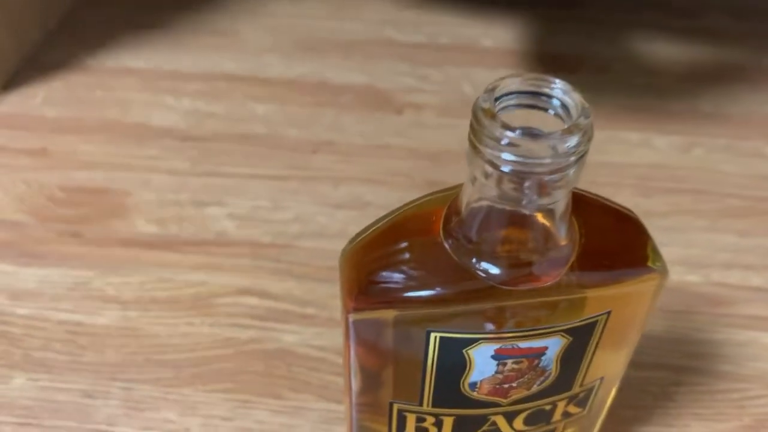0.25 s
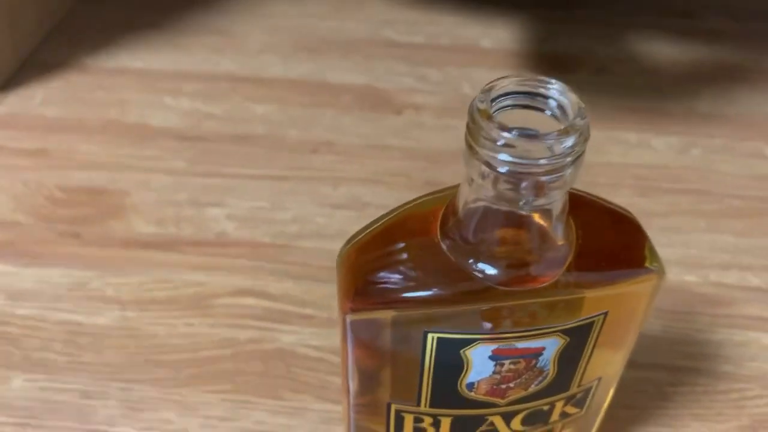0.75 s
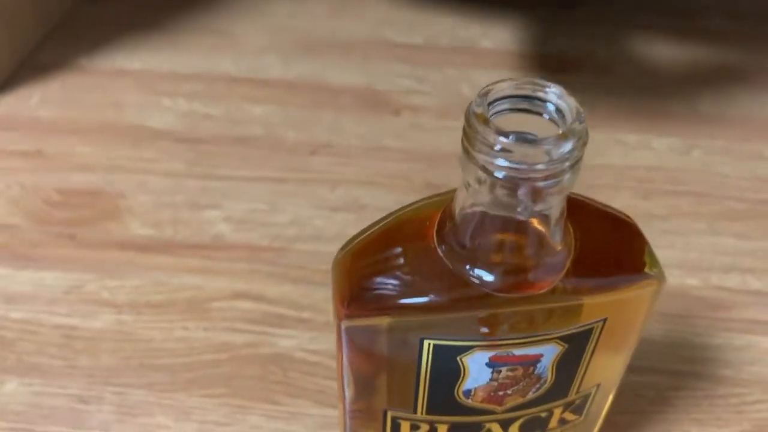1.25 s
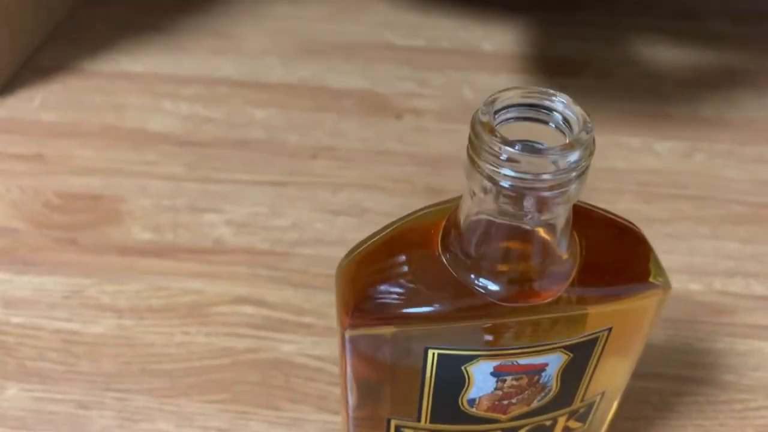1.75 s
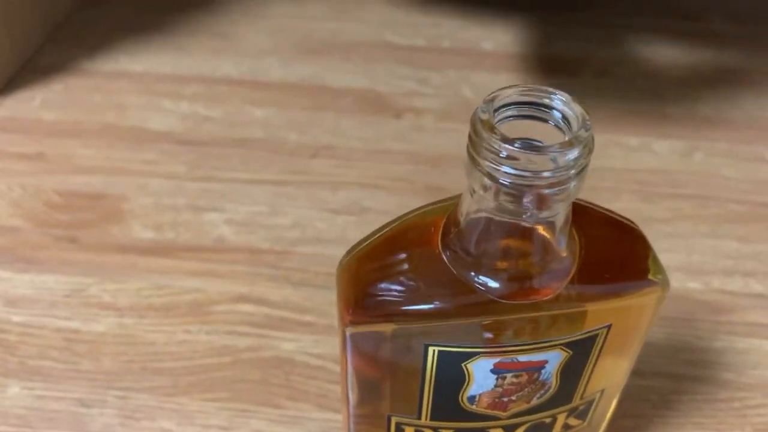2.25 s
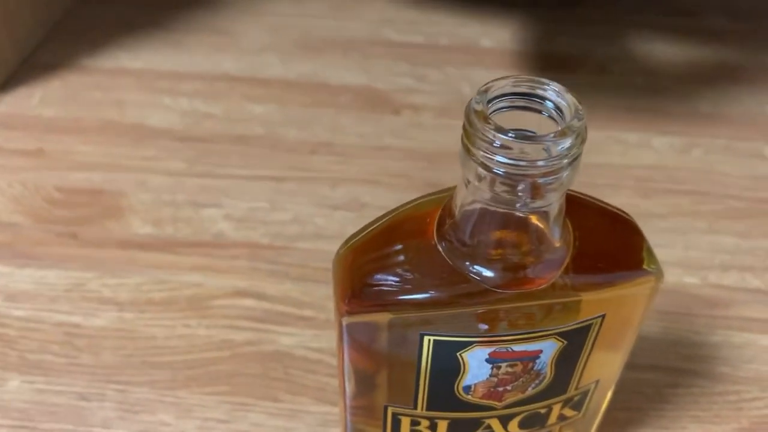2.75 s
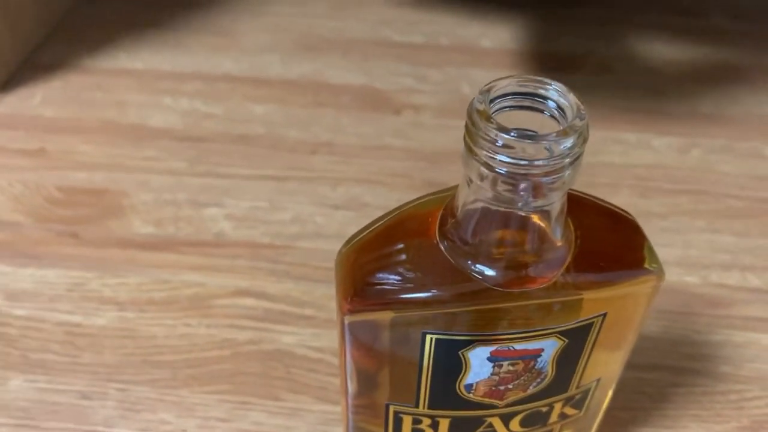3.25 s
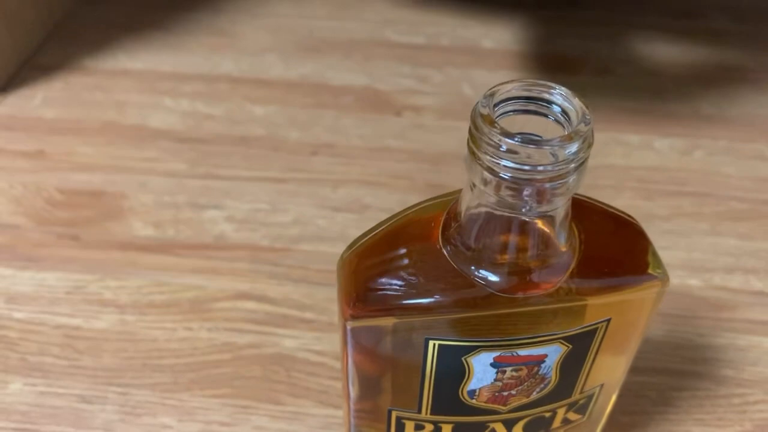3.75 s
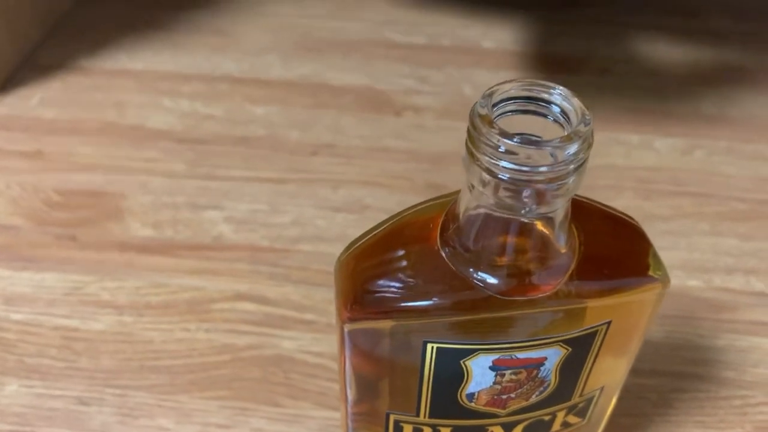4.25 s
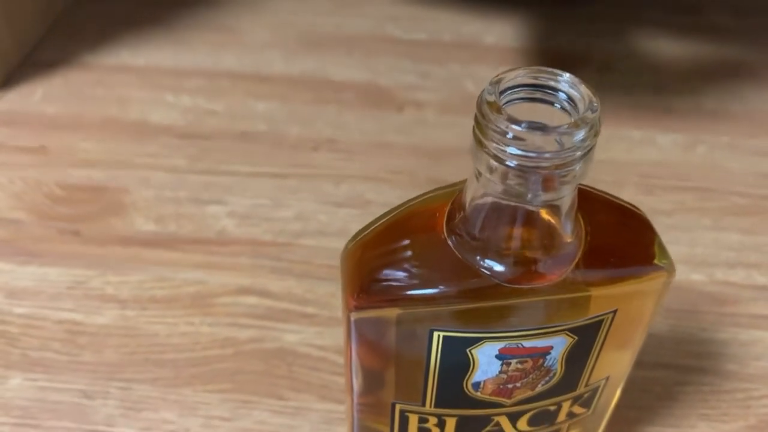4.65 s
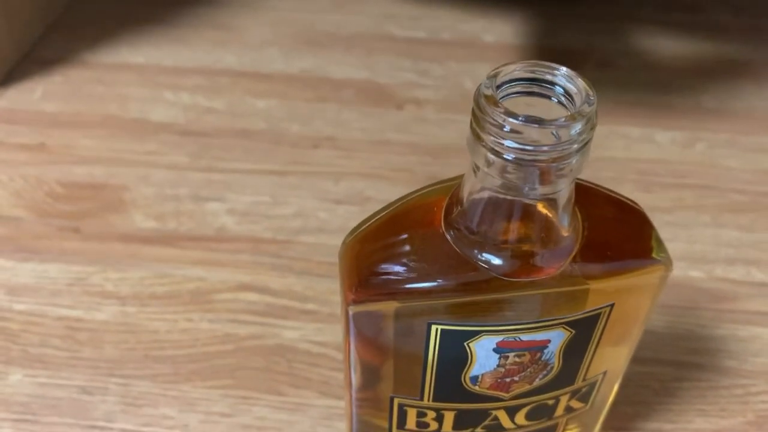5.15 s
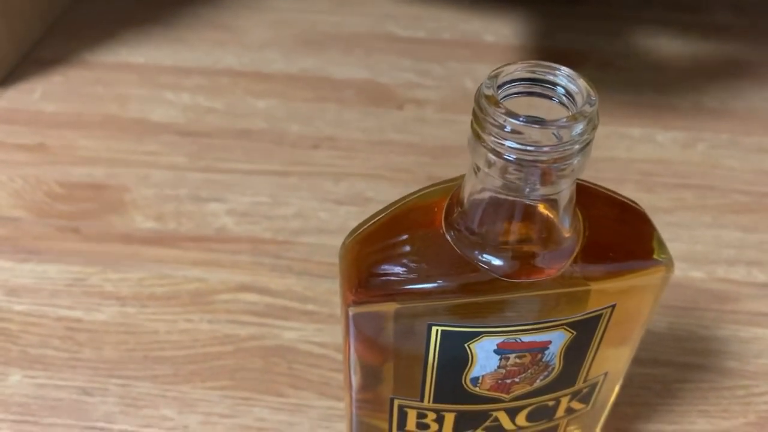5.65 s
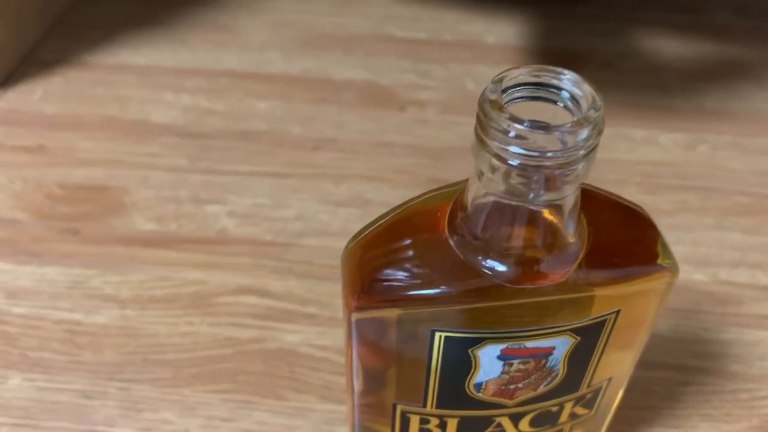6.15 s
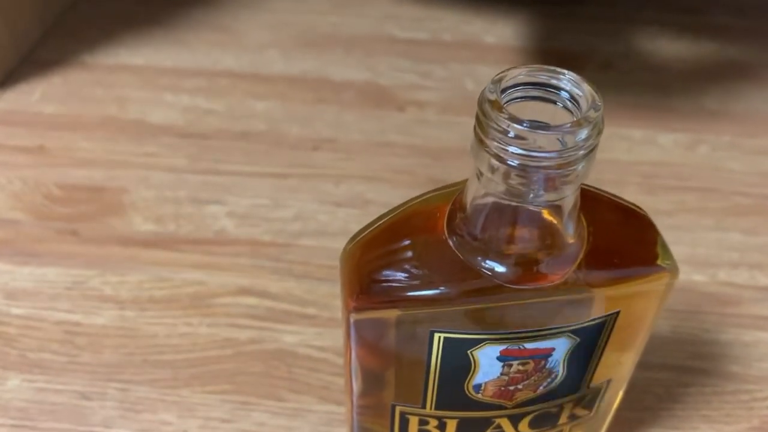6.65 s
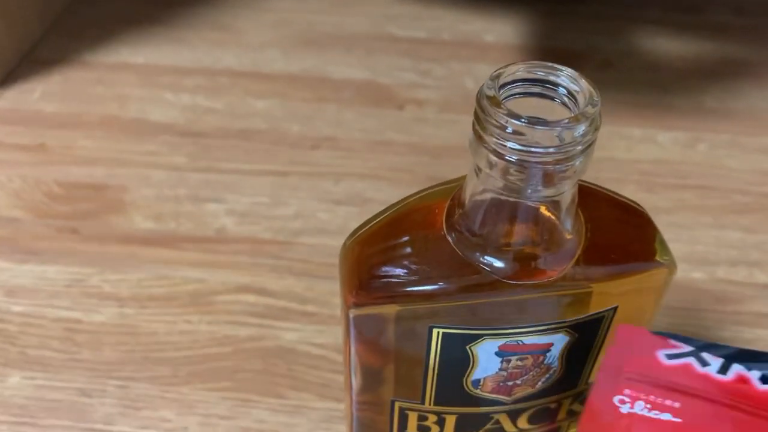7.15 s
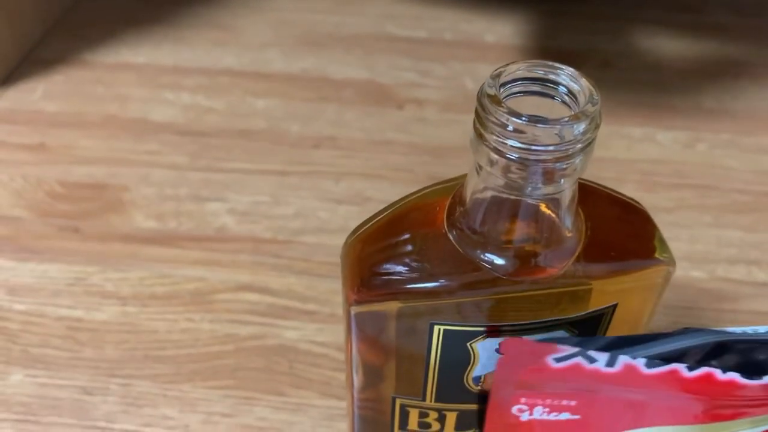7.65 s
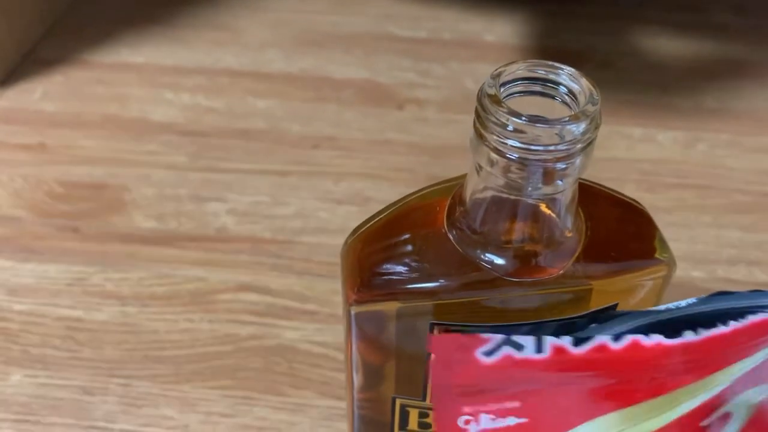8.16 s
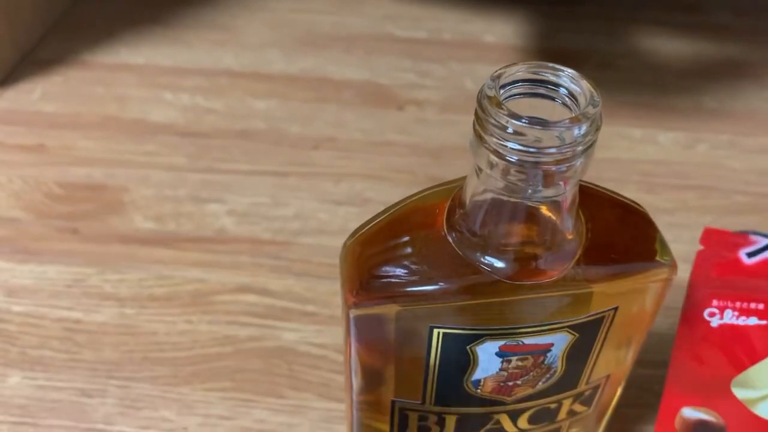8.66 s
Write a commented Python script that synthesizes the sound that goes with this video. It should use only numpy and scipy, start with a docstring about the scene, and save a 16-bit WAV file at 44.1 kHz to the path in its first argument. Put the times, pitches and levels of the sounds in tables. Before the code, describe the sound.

Close up in a small quiet room, hands brush and bump softly. A stiff plastic pouch crackles, something knocks hard on the wooden table, then a dull thud of gripping leads to dense crinkling and a short ripping tear. The opened pouch keeps rustling with a hollow ring, fades, and ends on a bump and loud snap. The hand-held stereo microphone picks up low rumble.

```python
"""A plastic snack pouch is handled close to a hand-held camera in a small quiet room, over low rumble and soft bumps.
First fingers slide on it and single creases snap, each with a faint hollow ring; drags and the first knocks follow.
Then the pouch is squeezed, which sets off swarms of tiny creases, and things knock hard on the wooden table.
A dull thud of gripping comes before the seal rips open in a run of quick plucks of the tight film. At last the mouth
of the open pouch colours the creases and its air rings louder, with one more bump, squeeze and loud snap at the end."""
import sys
import numpy as np
from scipy import signal
from scipy.fft import rfft, irfft, next_fast_len
from scipy.io import wavfile
from scipy.ndimage import uniform_filter1d

SR = 44100
rng = np.random.default_rng(int(sys.argv[2]) if len(sys.argv) > 2 else 0)


def master(y):
    """Save y as 16-bit WAV."""
    cut = np.clip(np.atleast_2d(y).T, -1, 1)
    pcm = np.round(cut * 32767)  # scale
    wavfile.write(sys.argv[1], SR, pcm.astype(np.int16))


N = 393372
TIME = np.arange(N) / SR  # [s]

# background noise of the room: (frequency [Hz], level [dB])
QUIET_SPECTRUM = [(15, -33), (25, -24), (64, -5.5), (123, -22), (1790, -30.5), (2690, -34.5), (10700, -36),
                  (13600, -25.5), (16000, -62.5)]
QUIET_DB = -75
# rumble as the hand on the camera tightens and relaxes: (time [s], level before a 4.5 dB lift [dB])
GRIP_RUMBLE = [(0.0, -62.5), (0.79, -63), (1.94, -83.5), (3.13, -82), (3.35, -65.5), (3.55, -50.5),
               (3.82, -70), (4.37, -55), (4.65, -70.5), (5.09, -59.5), (5.69, -74), (5.96, -56.5),
               (6.06, -56), (6.61, -56.5), (6.98, -74.5), (7.55, -67.5), (8.37, -83.5), (8.92, -72)]
# colour of the handling rumble: (frequency [Hz], level [dB])
RUMBLE_SPECTRUM = [(15, -40.5), (25, -12), (91, -1), (174, -8.5), (214, -8), (303, -20), (700, -28),
                   (1100, -91)]
# soft bumps of handling: (time [s], peak level before a 1.5 dB lift [dB])
BUMPS = [(0.16, -50), (0.279, -49.5), (0.934, -48.5), (1.129, -53), (1.244, -47.5), (1.351, -60.5),
         (1.664, -50.5), (1.706, -57), (1.803, -59), (3.169, -53.5), (3.431, -44), (3.472, -44.5),
         (3.57, -42.5), (3.958, -40.5), (4.02, -46), (4.81, -55.5), (4.87, -46), (4.995, -41.5),
         (5.188, -50), (5.254, -47), (5.582, -47), (5.721, -45), (8.883, -47.5)]
# fingers sliding on the film: (middle of stroke [s], length [s], hiss level [dB], rub level [dB])
STROKES = [(0.176, 0.2, -63.5, -67), (0.5, 0.6, -74.5, -71), (0.942, 0.087, -68.5, -70.5),
           (1.071, 0.04, -55, -68), (1.122, 0.4, -69.5, -74.5), (1.244, 0.1, -60.5, -70.5),
           (1.545, 0.5, -70, -78), (1.795, 0.046, -64.5, -75), (2.035, 0.049, -68.5, -77.5),
           (2.378, 0.082, -58, -66.5), (2.501, 0.077, -57.5, -65), (2.656, 0.058, -59, -69.5),
           (3.235, 0.22, -56, -59), (4.86, 0.15, -68, -65), (5.277, 0.24, -69, -66.5),
           (5.849, 0.052, -47.5, -60.5), (7.135, 0.24, -66, -66.5), (8.315, 0.35, -57, -73),
           (8.494, 0.3, -65.5, -71), (8.848, 0.14, -55.5, -59)]
# colour of fingers on film: (frequency [Hz], level [dB])
RUB_SPECTRUM = [(240, -7.5), (400, -10.5), (2930, -16), (10500, -1), (11900, 2.5), (13300, 4.5),
                (16000, -8)]
# single creases, loud and faint, and a soft low knock at 0.161 s: (time [s], strength [dB], low body over
# strength [dB],
SNAPS = [(0.161, -62.5, 10.5, -3), (0.1756, -65, 6, 5.5), (0.9134, -64.5, -31, 10), (3.2113, -48, -10, -24),
         (3.2924, -56.5, -6, -12.5), (3.318, -51.5, -10.5, 2), (3.3275, -42, -5.5, 2),
         (3.36, -40, -20, -10.5), (3.3778, -44, -1.5, 9.5), (3.4002, -32.5, -14.5, 11.5),
         (3.423, -43.5, 2.5, 13.5), (3.426, -30.5, -12.5, 6), (3.436, -40, -3.5, -5.5),
         (3.4663, -37, 0, 5.5), (3.4714, -35, -4, -7), (3.6294, -51.5, -2, 3), (3.599, -41, -16, -18),
         (3.7254, -47.5, -3, 9.5), (3.8727, -54.5, -16.5, -14), (3.8886, -46, 0, 4),
         (3.9264, -38, -11.5, -14), (3.944, -50, 4.5, 7), (3.9576, -34.5, -14, 1.5), (3.962, -40.5, -6, 1),
         (3.973, -37.5, -9, -9), (3.9823, -39, -3.5, 8.5), (4.0271, -49.5, 5.5, 7),
         (4.6465, -48.5, -12, -27), (4.832, -67, -10, 8), (4.849, -58, 0, -6), (4.912, -56, -2, -11),
         (4.9508, -67, 3, -1), (4.9699, -43.5, -8.5, -11), (5.016, -53, -16, 7), (5.5824, -41.5, -7.5, 2),
         (5.6866, -58.5, -10, 0), (5.7337, -52, -6, -21), (5.7525, -51.5, -22, 9), (6.0454, -32.5, -7.5, 6),
         (6.074, -28.5, -9, 10), (6.105, -42, -33, -20), (6.1712, -50.5, -15, -16), (6.3123, -54, 9.5, -15),
         (6.3626, -61, -7, -16), (6.4082, -46, 5, -8), (6.4823, -55.5, -2.5, -22.5), (6.5069, -31, -5, -11),
         (6.5355, -36.5, -4, -7), (6.546, -43, 1, 7.5), (6.5849, -32.5, -3, 1), (6.601, -34.5, -11, -8),
         (6.6129, -29, -16, 2.5), (6.6273, -25, -19.5, -8), (6.6392, -29, -7.5, -16),
         (6.6834, -33, -11.5, -24), (6.7076, -27.5, -19, -29), (6.905, -40, -2.5, -22),
         (6.9836, -34.5, -7.5, -5.5), (7.238, -34.5, -4.5, -17), (7.248, -35, -11, -18),
         (7.2744, -28.5, -31, -7.5), (7.289, -34, -9.5, -9), (7.298, -45.5, 6.5, -20),
         (7.3688, -47, -9, -8), (7.428, -55, 8.5, -23), (7.3574, -41.5, -26, 4), (7.4639, -48, -5, -0.5),
         (7.5899, -34.5, -14.5, -0.5), (7.598, -41.5, 0.5, -6), (7.6089, -43.5, -3, 1.5),
         (7.665, -40, -9, -1), (7.794, -54.5, -14, -4), (7.818, -40, -0.5, -3), (7.842, -47, -10, -17),
         (7.998, -42.5, -18, -4), (8.0169, -44.5, -8, -10), (8.059, -53, 6.5, -10), (8.0743, -43.5, -1, 1),
         (8.1404, -51.5, 10, -4), (8.153, -53, 4.5, 1), (8.222, -39.5, -2, -6), (8.4636, -58, -12, -11),
         (8.544, -55.5, 8.5, -3), (8.8691, -34, 0.5, 0.5)]
# common colour of the stiff film: (frequency [Hz], level [dB])
FILM_SPECTRUM = [(150, -22), (250, -3), (528, -2), (760, -10), (1150, -4.5), (2490, -2.5), (7570, -12.5),
                 (8700, -14), (9830, -11.5), (11900, -10), (13900, -8), (16000, -24)]
# body, crackle and fizz of a crease: (lower edge [Hz], upper edge [Hz])
CREASE_BANDS = [(280, 1000), (1000, 5000), (5000, 16000)]
# where the pouch is: (time [s], lead of the right microphone, negative if the left leads [ms])
PLACE = [(0, 0.072), (4.0, 0.064), (6.6, 0.037), (7.2, -0.037)]
# air in the pouch: (time [s], lower resonance [Hz], its strength [dB], strength of the upper resonance [dB])
HOLLOW = [(6.62, 360, -13, -6), (6.76, 352, 4.5, 3), (6.95, 343, -11, 0.5), (7.28, 337, 5, 10),
          (7.44, 350, 11, 1), (7.6, 416, 15, -6), (7.8, 362, 0.5, -4), (8.07, 378, 12, -5),
          (8.22, 387, -11, -5), (8.55, 400, 5, -11.5), (8.9, 383, -11.5, -14)]
UPPER_HOLLOW_HZ = 549  # the upper resonance stays put
# fingertips dragging with more pressure: (middle of drag [s], length [s], level [dB])
DRAGS = [(1.044, 0.066, -66.5), (1.66, 0.27, -76.5), (3.288, 0.037, -58), (5.835, 0.1, -57.5),
         (6.34, 0.39, -62.5)]
# colour of a pressed drag: (frequency [Hz], level [dB])
DRAG_SPECTRUM = [(200, -21), (550, -9), (1200, 1.5), (2600, -17.5), (6000, -39.5)]
# hard things knocking on the table: (time [s], clack level before a 2 dB cut [dB], tick level [dB], contact time [s])
KNOCKS = [(1.386, -61.5, -68.5, 0.0048), (2.8615, -34, -48, 0.00088), (4.2602, -20.5, -52.5, 0.0018),
          (4.3319, -26.5, -59, 0.0026), (4.36, -36, -72, 0.0025), (4.376, -43, -80, 0.0037),
          (4.4891, -54.5, -75, 0.0047), (4.518, -55, -69, 0.0025)]
# colour of the woody clack: (frequency [Hz], level [dB])
WOOD_SPECTRUM = [(120, -28.5), (200, -9.5), (449, -5.5), (612, -3), (749, -5), (1220, -2.5), (2450, -12.5),
                 (3340, -15.5), (4200, -14.5), (5000, -32.5), (6500, -51), (11000, -120)]
# modes of the table top: (frequency [Hz], relative level [dB], time to fall 60 dB [s])
TABLE_MODES = [(173.3, 6, 0.071), (465, -7, 0.052), (593, -3.5, 0.066), (834, -1, 0.049), (1218, 3.5, 0.07),
               (1408, -2, 0.077), (1910, -5.5, 0.081)]
SETTLE_S = 0.00302  # from the first contact of an edge to the full weight of the blow
# squeezes and pulls: (greatest force [s], rise [s], fade [s], strength [dB],
#                      low body over strength [dB], brightness over strength [dB])
SQUEEZES = [(3.227, 0.017, 0.016, -45, 6.5, -5), (3.476, 0.12, 0.12, -39, 0, -3),
            (3.6, 0.28, 0.57, -53.5, -1, -1.5), (3.968, 0.038, 0.11, -39, -6, -4),
            (4.023, 0.09, 0.052, -42, -4, -2.5), (4.262, 0.54, 0.28, -60.5, 1, 1.5),
            (4.875, 0.24, 0.39, -64.5, 0, 1.5), (5.02, 0.038, 0.081, -59, 0.5, 1),
            (5.209, 0.11, 0.083, -65.5, 2.5, -0.5), (5.73, 0.14, 0.18, -56.5, -2.5, 2),
            (5.896, 0.029, 0.052, -54.5, 0, -0.5), (5.999, 0.024, 0.34, -48.5, -1.5, -2.5),
            (6.216, 0.058, 0.033, -56, 7, 0.5), (6.319, 0.059, 0.032, -50, 0.5, -10),
            (6.41, 0.18, 0.15, -56.5, -0.5, -2.5), (6.618, 0.081, 0.12, -29, -7, -2),
            (6.715, 0.36, 0.13, -37.5, -8, -1.5), (6.9, 0.25, 0.14, -50, -9.5, -5),
            (7.245, 0.057, 0.14, -40.5, -5.5, 0.5), (7.3, 0.048, 0.27, -44.5, -4, -9),
            (7.42, 0.34, 0.22, -53.5, 0, 0.5), (7.601, 0.16, 0.08, -49.5, -13, -1.5),
            (7.73, 0.22, 0.095, -61.5, 6.5, 0), (7.83, 0.19, 0.19, -58.5, 1, 1.5),
            (8.061, 0.16, 0.13, -57, 3, 3), (8.149, 0.41, 0.37, -67.5, 11.5, -21),
            (8.888, 0.2, 0.49, -54, 2.5, 0)]
SQUEEZE_RANGE_DB = 23  # gained over a squeeze's rise and lost over its fade
SQUEEZE_BEND = 0.82  # below 1 the level falls fastest right beside the peak
# dull thud of the pouch being gripped: (time [s], peak level [dB])
THUD = (5.899, -31.5)
# modes of that thud: (frequency [Hz], relative level [dB], time to fall 60 dB [s])
THUD_MODES = [(54.6, 2.1, 0.43), (348, 9.4, 0.089), (493, 3.9, 0.042)]
# the seal ripping open: (time [s], level [dB])
RIP = [(6.58, -53), (6.62, -27.5), (6.66, -39.5), (6.71, -41), (6.75, -43), (6.83, -59.5)]
# modes of the tight film: (frequency [Hz], relative level [dB], time to fall 60 dB [s])
TAUT_MODES = [(335, -5, .03), (1950, 3, 0.005), (2680, 12, 0.006), (3540, 4, .005)]
OPEN_S = 7.1  # from here on the mouth of the pouch stands open
# colour given by the open mouth: (frequency [Hz], gain [dB])
MOUTH_SPECTRUM = [(210, -6.5), (550, -4.5), (730, -7.5), (1320, -1), (4830, 0.5), (5500, -3), (6400, -4),
                  (8000, -1)]
# how alike noise is at the two microphones: (frequency [Hz], left-right likeness [0 to 1])
LIKENESS = [(400, 1), (1300, 0.66), (3000, 0.18), (7000, 0.3), (10000, 0.96), (14000, 0.99)]
# how fast the room's reflections die: (frequency [Hz], time to fall 60 dB [s])
ROOM_DECAY = [(150, 0.1), (1000, 0.052), (4000, 0.12), (14000, 0.062)]
WALL_S, WALL_DB = 0.027, -10.5  # echo of the nearest wall: delay, level against the diffuse reflections
# uneven treble of the microphones: (frequency [Hz], gain [dB])
MICROPHONE_SPECTRUM = [(7400, 0.5), (8400, 3.5), (9600, 2), (11000, -2), (13300, -4), (16000, -6)]
# the two microphone ports: (frequency [Hz], lag of the left [cycles])
PORT_LAG = [(0, .045), (3800, .08), (5400, .5), (6500, .88), (7200, 1), (8550, 1.5), (16800, 4)]
# the two microphone ports: (frequency [Hz], left minus right [dB])
PORT_BALANCE = [(1200, 0), (2800, 1), (4500, 2), (6000, -4.5), (7500, -0.5)]
EDGE_HZ = 16500  # upper limit of the finished sound


def amp(db):
    """Turns decibels into a plain gain."""
    return 10 ** (np.asarray(db) / 20)


def unit(x):
    """Scales to an rms (average strength) of 1."""
    return x / np.sqrt(np.mean(x ** 2) + 1e-20)


def smooth_power(x, size):
    """Power averaged over both channels and over a moving window of samples."""
    return uniform_filter1d((x ** 2).mean(0), size, mode="constant")


def peaked(x, size=176):
    """Scales the loudest 4 ms to rms 1."""
    return x / np.sqrt(smooth_power(x, size).max() + 1e-20)


def read(points, hz):
    """Reads a spectrum, joining its points on a logarithmic frequency axis."""
    f, value = np.transpose(points)
    return np.interp(np.log(hz + 1), np.log(f + 1), value)


def track(rows, t, axis=1):
    """Reads one column of a control curve at times t."""
    rows = np.asarray(rows)
    return np.interp(t, rows[:, 0], rows[:, axis])


def add(mix, s, sound):
    """Mixes a stereo sound in at time s."""
    part = mix[:, max(round(s * SR), 0):][:, :sound.shape[1]]
    part += sound[:, :part.shape[1]]


def colour(x, points, size=2048):
    """Filters to the given spectrum without sounding ahead of its input (minimum phase)."""
    gain_db = np.maximum(read(points, abs(np.fft.fftfreq(size, 1 / SR))), -100)
    log_gain = np.log(amp(gain_db))
    taps = np.fft.ifft(np.exp(np.conj(signal.hilbert(log_gain)))).real
    return signal.oaconvolve(x, taps[None, :size // 2], axes=1)[:, :x.shape[1]]


def band(x, edges):
    """Keeps only the frequencies between two edges."""
    return signal.sosfilt(signal.butter(3, edges, "band", fs=SR, output="sos"), x)


def pair(size, lead_ms=0):
    """Noise at two microphones: partly alike, and below the treble earlier on the side of the source."""
    a, b = rfft(rng.standard_normal((2, size)))
    hz = np.fft.rfftfreq(size, 1 / SR)
    same = np.clip(read(LIKENESS, hz), 0, 1)
    delay_s = lead_ms / 1000 * np.exp(-(hz / 5500) ** 4)
    left = same * a + np.sqrt(1 - same ** 2) * b
    left = left * np.exp(-2j * np.pi * hz * delay_s)
    return irfft(np.array([left, a]), size)


def burst(lead_ms, rise_s, crack_s, ring_s, ring_db, size=4096):
    """A sharp crack of noise followed by the brief ring of many crowded modes."""
    t = np.arange(size) / SR
    onset = 1 - np.exp(-(t / rise_s) ** 2)
    decay = np.exp(-t / crack_s) + amp(ring_db) * np.exp(-t / ring_s)
    return pair(size, lead_ms) * onset * decay


def ring(modes, rise_s, size=16384):
    """Fading tones, all set going by one blow."""
    t = np.arange(size) / SR
    sound = np.zeros(size)
    for hz, db, t60 in modes:
        sound += amp(db - 60 * t / t60) * np.sin(2 * np.pi * (hz * t + rng.random()))
    onset = 1 - np.exp(-t / rise_s)
    return peaked((sound * onset)[None]) * np.ones((2, 1))


def quiet_room():
    """Steady faint noise is the background of the room."""
    return amp(QUIET_DB) * unit(colour(pair(N), QUIET_SPECTRUM, size=8192))


def bump(start_hz, end_hz, fall_s, swell_s, rough, size=6500):
    """A dull uneven bump: a tone sliding down in pitch, because higher waves arrive a little earlier."""
    t = np.arange(size) / SR
    first_hz = start_hz * rng.uniform(0.78, 1.4)  # each bump differs
    hz = end_hz + (first_hz - end_hz) * np.exp(-t / fall_s)
    tone = np.sin(2 * np.pi * np.cumsum(hz) / SR)
    wave = tone + rough * unit(colour(pair(size), RUMBLE_SPECTRUM))
    return peaked(wave * (t / swell_s) ** 2 * np.exp(-t / swell_s))


def handling():
    """Lumpy rumble of the grip with separate bumps, each begun by the soft pat of skin."""
    lumps = amp(3.8 * unit(uniform_filter1d(rng.standard_normal(N), size=2400)))
    rumble = unit(colour(pair(N), RUMBLE_SPECTRUM, size=8192) * lumps)
    out = rumble * amp(track(GRIP_RUMBLE, TIME) + 4.5)
    for s, db in BUMPS:
        pat = peaked(band(burst(0, rise_s=0.013, crack_s=0.0061, ring_s=0.011, ring_db=-14), (250, 800)))
        thump = bump(start_hz=263.8, end_hz=59, fall_s=0.0125, swell_s=0.0098, rough=0.4)
        add(out, s - 0.004, amp(db - 16) * pat)
        add(out, s - 0.002, amp(db + 1.5) * thump)
    return out


def stroke(middle_s, length_s):
    """A finger speeds up and slows down again in one smooth bell."""
    return np.exp(-np.minimum((2 * (TIME - middle_s) / length_s) ** 2, 20))


def slide():
    """Fingers brush the smooth film in short soft strokes: grainy noise split into rub and hiss."""
    grain = amp(1.8 * unit(uniform_filter1d(rng.standard_normal(N), size=150)))
    friction = colour(pair(N, track(PLACE, 0)) * grain, RUB_SPECTRUM)
    power = np.zeros((2, N))
    for s, length_s, hiss_db, rub_db in STROKES:
        power += np.outer(amp([hiss_db, rub_db]), stroke(s, length_s)) ** 2
    hiss_level, rub_level = np.sqrt(power)
    rub = unit(band(friction, (400, 4500)))
    hiss = unit(band(friction, (4500, 16000)))
    return rub * rub_level + hiss * hiss_level


def facet(uneven_db, count=44):
    """The spectrum of one facet of film: the common colour with resonances of its own."""
    hz = np.geomspace(300, 16000, count)
    return np.transpose([hz, read(FILM_SPECTRUM, hz) + uneven_db * rng.standard_normal(count)])


def snaps():
    """A crease buckles; the slow waves of the film ring longer than the fast ones."""
    out = np.zeros((2, N))
    # body, crackle, fizz: (rise [s], crack decay [s], ring decay [s], ring level [dB])
    shapes = [(0.0007, 0.003, 0.012, -13), (0.0008, 0.0008, 0.0065, -20), (0.0006, 0.0006, 0.004, -19)]
    for s, db, weight_db, bright_db in SNAPS:
        lead_ms, film = track(PLACE, s), facet(uneven_db=3.2)
        body, crackle, fizz = [peaked(band(colour(burst(lead_ms, *shape), film), edges))
                               for shape, edges in zip(shapes, CREASE_BANDS)]
        add(out, s - 0.0004, amp(db) * (amp(weight_db) * body + crackle + amp(bright_db) * fizz))
    return out


def resonate(x, hz, width_hz):
    """A resonance of gain 1 whose pitch may move: shift it to 0 Hz, smooth, shift back."""
    turn = np.exp(2j * np.pi * np.cumsum(hz * np.ones(N)) / SR)
    r = np.exp(-np.pi * width_hz / SR)
    return 2 * (turn * signal.lfilter([1 - r], [1, -r], x / turn)).real


def hollow(x, width_hz):
    """Air in the pouch rings at two pitches; the lower follows its shape, the grip sets which is stronger."""
    hz = track(HOLLOW, TIME)
    # each resonance is passed twice to make it steeper
    lower = resonate(resonate(x, hz, width_hz), hz, width_hz)
    upper = resonate(resonate(x, UPPER_HOLLOW_HZ, width_hz), UPPER_HOLLOW_HZ, width_hz)
    return lower * amp(track(HOLLOW, TIME, axis=2)) + upper * amp(track(HOLLOW, TIME, axis=3))


def drags():
    """Skin pressed on the film gives a soft, hollow rub of very grainy noise."""
    grain = amp(5.3 * unit(uniform_filter1d(rng.standard_normal(N), size=300)))
    level = np.sqrt(sum(amp(db) ** 2 * stroke(s, length_s) ** 2 for s, length_s, db in DRAGS))
    return unit(colour(pair(N) * grain, DRAG_SPECTRUM)) * level


def knocks():
    """A blow on wood: a clack, the tick of contact, a crowded after-ring and the modes of the table top."""
    out = np.zeros((2, N))
    for s, clack_db, tick_db, contact_s in KNOCKS:
        clack = burst(0.04, contact_s, crack_s=0.0025, ring_s=0.018, ring_db=-20)
        clack = peaked(band(colour(clack, WOOD_SPECTRUM), (220, 4300)))
        tick = burst(0.036, contact_s, crack_s=0.0034, ring_s=0.021, ring_db=-22)
        tick = peaked(band(tick, (3500, 13000)))
        after = peaked(band(burst(0, contact_s, crack_s=0.022, ring_s=0.022, ring_db=0), (950, 1900)))
        add(out, s - 0.0012, amp(clack_db - 2) * clack + amp(tick_db) * tick + amp(clack_db - 21) * after)
        # the factor 1.31 makes soft blows move the table top far less than hard ones
        add(out, s + SETTLE_S, amp(1.31 * clack_db - 2.2) * ring(TABLE_MODES, rise_s=0.0011))
    return out


def squeeze(peak_s, rise_s, fade_s):
    """Force builds up to a peak, then the film settles."""
    before = (peak_s - TIME) / max(rise_s, 0.01)
    after = (TIME - peak_s) / max(fade_s, 0.01)
    away = np.minimum(np.maximum(before, after), 10)
    return amp(-SQUEEZE_RANGE_DB * away ** SQUEEZE_BEND)


def swarm(per_s, spread_db, scrape_db, count=36, size=2200):
    """Tiny creases of very unequal size, each on a facet with its own ring, over a fine scrape."""
    creases, scrape = np.zeros((2, 2, N))
    for part in np.array_split(np.arange(N), count):
        start, lead_ms = TIME[part[0]], track(PLACE, TIME[part].mean())
        add(scrape, start, pair(len(part), lead_ms))
        for spot in range(6):  # six facets per stretch of time, each with its own creases
            sizes = amp(spread_db * np.minimum(rng.exponential(1, len(part)), 3))
            clicks = sizes * (rng.random(len(part)) < per_s / 6 / SR)
            grain = burst(lead_ms, rise_s=0.0003, crack_s=0.0004, ring_s=0.004, ring_db=-20, size=1024)
            grain = unit(colour(grain, facet(uneven_db=5)))
            add(creases, start, signal.fftconvolve(clicks[None], grain, axes=1))
    out = unit(creases) + amp(scrape_db) * unit(colour(scrape, FILM_SPECTRUM))
    layers = [band(out, edges) for edges in CREASE_BANDS]
    # even out slow changes of level, so that the squeezes shape it
    return [x / np.sqrt(uniform_filter1d((x ** 2).mean(0), size) + 1e-12) for x in layers]


def crinkle():
    """The swarm of creases swells with every squeeze as the pouch is kneaded, torn and spread."""
    power = np.zeros((3, N))
    for peak_s, rise_s, fade_s, db, weight_db, bright_db in SQUEEZES:
        band_power = amp([db + weight_db, db, db + bright_db]) ** 2
        power += np.outer(band_power, squeeze(peak_s, rise_s, fade_s) ** 2)
    body, crackle, fizz = swarm(per_s=400, spread_db=6, scrape_db=-7, size=3000)
    level = np.sqrt(power)
    return body * level[0] + crackle * level[1] + fizz * level[2]


def thud():
    """Gripping the pouch gives one padded blow of three low fading tones."""
    out = np.zeros((2, N))
    add(out, THUD[0], amp(THUD[1]) * ring(THUD_MODES, rise_s=0.0016))
    return out


def rip(slips_per_s, spread_db, left_db, left_lag=3):
    """The seal lets go in quick uneven slips, each plucking the tight film."""
    slips = amp(spread_db * rng.standard_normal(N)) * (rng.random(N) < slips_per_s / SR)
    pluck = ring(TAUT_MODES, rise_s=0.00019, size=1024)
    sound = signal.oaconvolve(slips[None], pluck, axes=1)[:, :N]
    sound = sound / np.sqrt(uniform_filter1d(sound[0] ** 2, size=1500) + 1e-9)
    sound = sound * amp(track(RIP, TIME)) * (TIME > RIP[0][0]) * (TIME < RIP[-1][0])
    # later (by left_lag samples) but stronger on the left
    return np.array([amp(left_db) * np.roll(sound[0], left_lag), sound[1]])


def opened(x):
    """Once torn open, the mouth of the pouch colours every crease."""
    gape = np.clip((TIME - OPEN_S) / 0.05, 0, 1)
    return x * (1 - gape) + colour(x, MOUTH_SPECTRUM) * gape


def room(x, size=16384):
    """Diffuse reflections that die at a rate set by pitch, and a second cluster from the nearest wall."""
    hz, t, z = signal.stft(pair(size), SR, nperseg=256)
    decay = amp(-60 * t / read(ROOM_DECAY, hz)[:, None])
    tail = signal.istft(z * decay, SR, nperseg=256)[1]
    t = np.arange(tail.shape[1]) / SR
    tail = tail * np.minimum(t / 0.004, 1)
    wall = pair(len(t)) * np.exp(-t / 0.0057)
    add(tail, WALL_S, amp(WALL_DB) * wall * np.linalg.norm(tail) / np.linalg.norm(wall))
    return signal.fftconvolve(x, tail / np.linalg.norm(tail[0]), axes=1)[:, :N]


def scene():
    """Pouch, table and hands in the quiet room."""
    pouch = opened(snaps() + crinkle()) + rip(slips_per_s=230, spread_db=1.5, left_db=4)
    pouch = pouch + hollow(pouch, width_hz=85)
    blows = knocks() + thud()
    reflections = room(amp(-12) * pouch + amp(-8) * blows)
    hands = handling() + slide() + drags()
    return quiet_room() + hands + pouch + blows + reflections


def ports(x):
    """The left port lags the right by more cycles toward the treble, and each has its own colour."""
    size = next_fast_len(N + SR)
    hz = np.fft.rfftfreq(size, 1 / SR)
    lean = amp(read(PORT_BALANCE, hz) / 2)
    left = lean * np.exp(-2j * np.pi * track(PORT_LAG, hz))
    return irfft(rfft(x, size) * np.array([left, 1 / lean]), size)[:, :N]


def record(dry):
    """The uneven treble of small microphone ports, then the band limit."""
    heard = ports(colour(dry, MICROPHONE_SPECTRUM))
    limit = signal.firwin(511, EDGE_HZ, window=("kaiser", 9), fs=SR)
    return signal.oaconvolve(heard, limit[None], "same", axes=1)


dry = scene()
out = record(dry)
master(out)
```